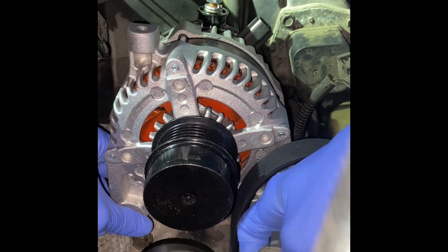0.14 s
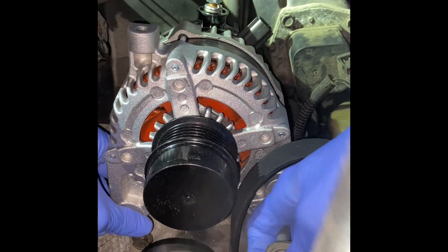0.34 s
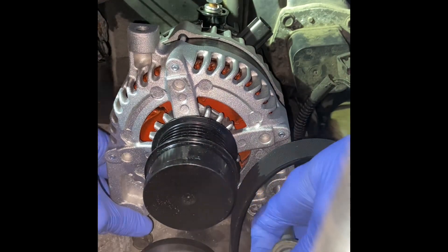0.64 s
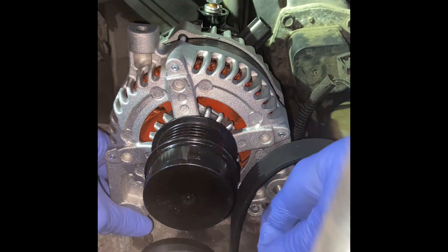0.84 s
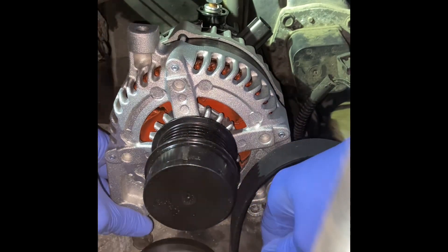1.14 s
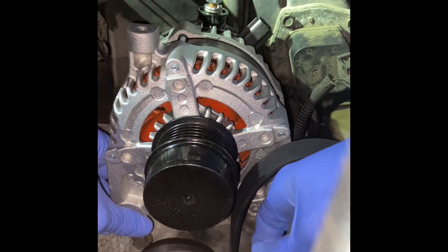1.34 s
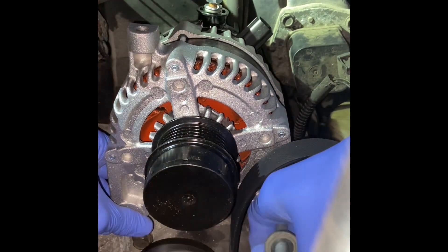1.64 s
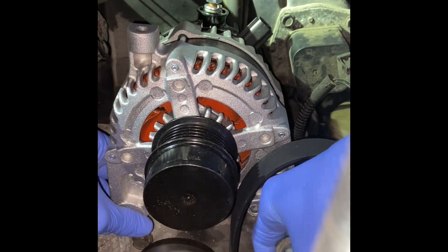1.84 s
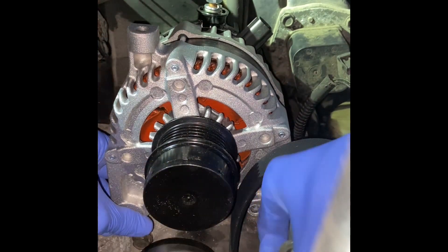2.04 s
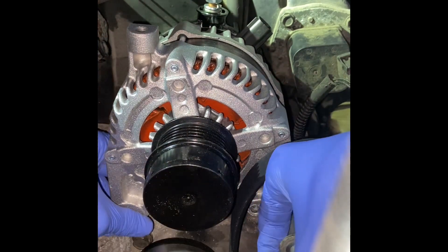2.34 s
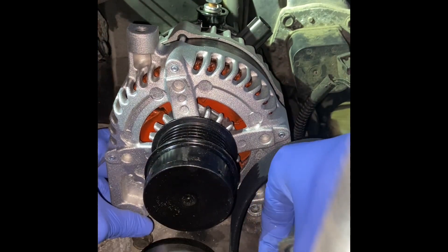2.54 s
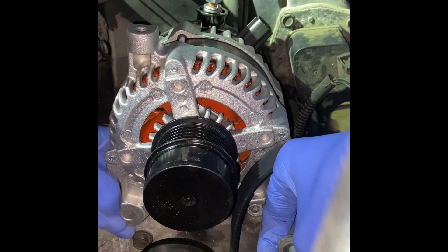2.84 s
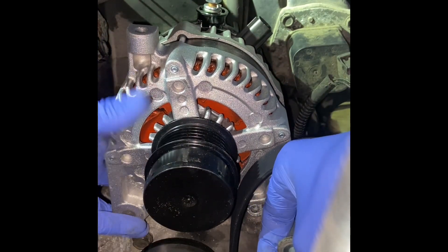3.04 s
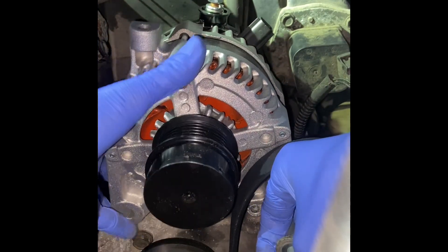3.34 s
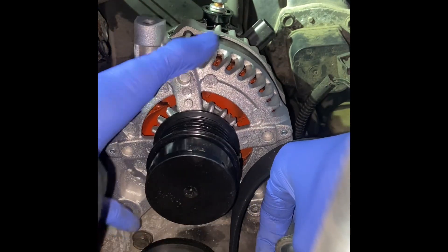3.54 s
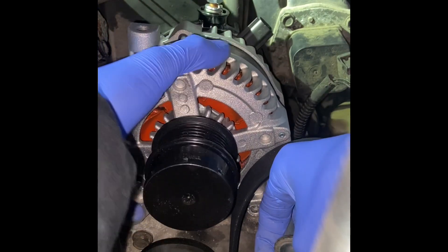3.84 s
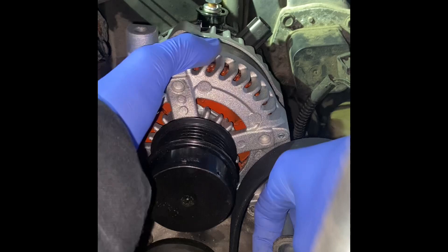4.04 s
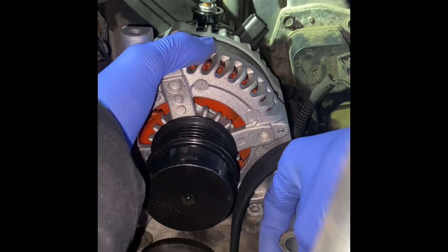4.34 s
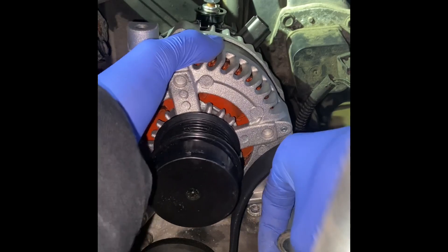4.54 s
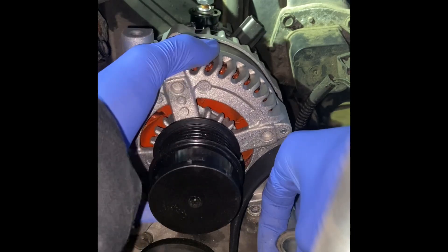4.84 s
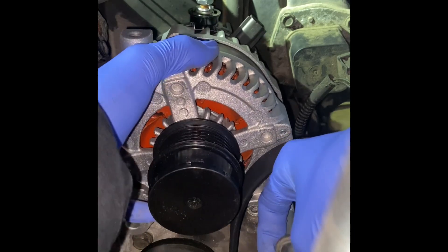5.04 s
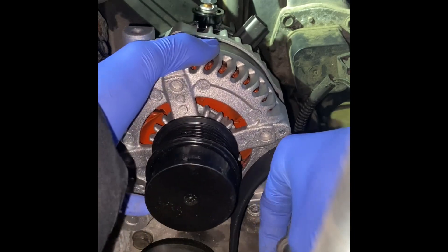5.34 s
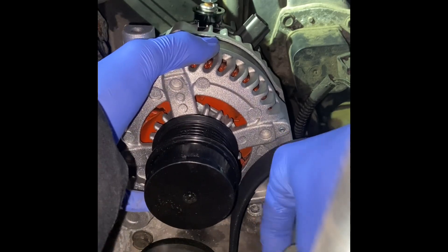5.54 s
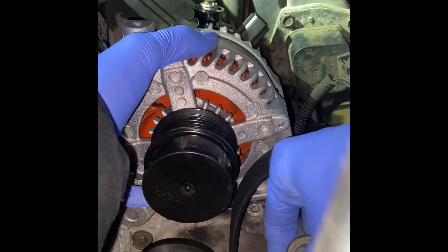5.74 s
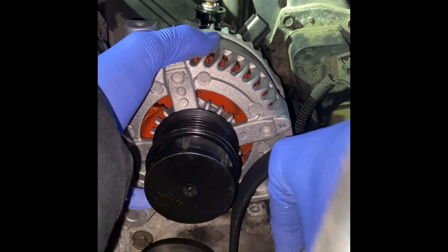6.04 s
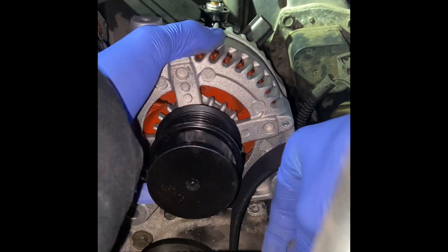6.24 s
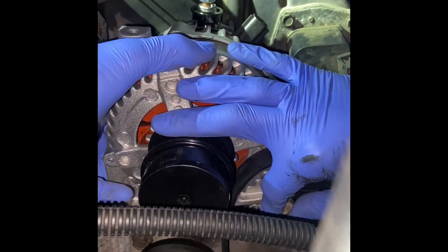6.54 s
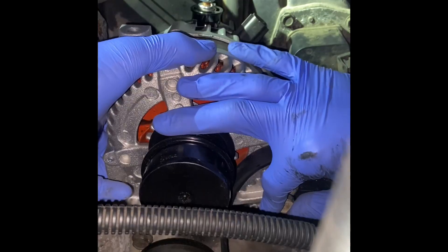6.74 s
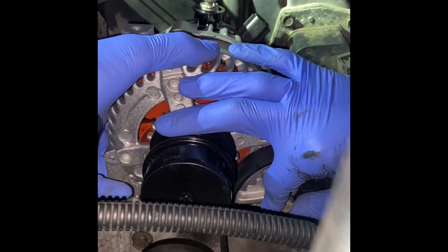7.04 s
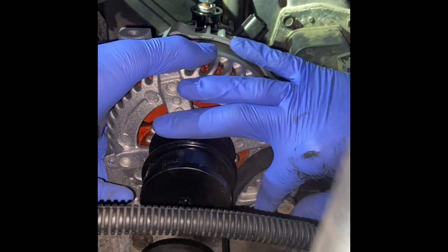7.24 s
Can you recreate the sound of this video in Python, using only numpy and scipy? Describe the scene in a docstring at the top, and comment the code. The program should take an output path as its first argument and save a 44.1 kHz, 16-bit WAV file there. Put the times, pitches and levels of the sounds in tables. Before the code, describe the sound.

In an engine bay, heard very close, gloved hands wiggle a metal casting into its bracket. A sharp clack comes early, then a tight flurry of hard knocks around one second, followed by sparser taps, scrapes and glove rubs. One strong knock with a low judder lands past four seconds. A quiet rumble and wavering hum continue beneath, and the ending is nearly still.

```python
"""An alternator is wiggled into its bracket in an engine bay by gloved hands, close to a two-port microphone.
Lugs knock on the mount: damped modes of the aluminium casting ring briefly, and the bracket adds a slow low thud.
Between knocks, friction noise rubs, squeaks and squeals as stick and slip, and small parts tick.
Filtered noise and a wavering sine make the low workshop rumble and hum underneath."""
import sys
import numpy as np
from scipy import signal
from scipy.fft import rfft, irfft, next_fast_len
from scipy.io import wavfile
from scipy.ndimage import uniform_filter1d

SR = 44100
rng = np.random.default_rng(int(sys.argv[2]) if len(sys.argv) > 2 else 0)


def store_wav(level_fs):
    """Save 16-bit WAV to argv[1]."""
    pcm = np.round(np.clip(np.atleast_2d(level_fs), -1, 1) * 32767)
    wavfile.write(sys.argv[1], SR, pcm.T.astype(np.int16))


N = 326498
T = np.arange(int(.18 * SR)) / SR  # time within one impact, s
QUIET_S = 6.335  # the rubbing drops abruptly here and the specks end


def undb(db):
    """Logarithmic level: decibels to amplitude gain."""
    return 10 ** (np.asarray(db) / 20)


def colour(x, points):
    """Minimum-phase filtering: a causal response through (f/Hz, level/dB) points, from the folded cepstrum."""
    size = 2 * next_fast_len(x.shape[-1])
    hz, db = np.transpose(points)
    f = np.maximum(np.arange(size // 2 + 1) * SR / size, 1)
    gain = undb(np.interp(np.log(f), np.log(hz), db))
    cepstrum = irfft(np.log(gain))
    cepstrum[1:size // 2] *= 2
    cepstrum[size // 2 + 1:] = 0
    response = np.exp(rfft(cepstrum))
    return irfft(rfft(x, size) * response, size)[..., :x.shape[-1]]


def band(x, lo_hz, hi_hz):
    """Band limitation: a Butterworth band-pass applied twice."""
    edges = [lo_hz, min(hi_hz, SR / 2 - 1)]
    sections = signal.butter(N=2, Wn=edges, btype="band", fs=SR, output="sos")
    return signal.sosfilt(sections.repeat(2, axis=0), x)


# side against mid at the two ports: f/Hz, level/dB
SIDE_SPECTRUM = [(30, -24.5), (150, -23), (350, -6), (700, 5), (2000, -3), (4500, 0.5), (9000, 2),
                 (12000, -7), (15000, 11.5)]


def ports(pair):
    """Coherence between two ports: a shared mid and an unrelated side that is weak in the bass."""
    side = colour(pair[1], SIDE_SPECTRUM)
    return np.array([pair[0] + side, pair[0] - side])


def level(x, db):
    """Energy normalization: set the rms of the middle."""
    return x * undb(db) / x.mean(axis=0).std()


def strength(x, db):
    """Short-time energy: set the rms of each row's strongest 5 ms."""
    power = uniform_filter1d(x ** 2, size=220)
    return x * undb(db) / np.sqrt(power.max(axis=1, keepdims=True))


def walk(rate, size=N):
    """Slow random modulation: levels held 1 / rate s and smoothed twice; spread near 1."""
    k = int(SR / rate)
    held = np.repeat(rng.standard_normal(size // k + 1), k)
    return 1.3 * uniform_filter1d(uniform_filter1d(held, k), k)[:size]


def fade(t60):
    """Exponential decay: 60 dB in t60 seconds."""
    return np.exp(-np.log(1000) * T / t60)


def modes(table, detune, damping=1):
    """Modal superposition: decaying mid and side partials, detuned by the grip, weighted by the contact point."""
    hz, db, t60 = np.transpose(table)[:, :, None]
    hz = hz * (1 + detune * rng.standard_normal(hz.shape))
    weight = undb(db + 2 * rng.standard_normal(hz.shape))
    ring = weight * np.exp((2j * np.pi * hz - damping * np.log(1000) / t60) * T)
    start_phase = np.exp(2j * np.pi * rng.random((2, len(hz))))
    pair = (start_phase @ ring).imag
    return pair / np.sqrt(np.sum(undb(db) ** 2) / 2)


def resound(x, table, damping):
    """Forced resonance: a steady excitation convolved with a body's modes, damped by the hands that hold it."""
    response = modes(table, detune=0.0024, damping=damping)[:1]
    return signal.fftconvolve(x, response, axes=1)[:, :N]


def add(out, s, sound):
    """Linear superposition: mix a sound in at s seconds."""
    i = max(int(s * SR), 0)
    out[:, i:i + sound.shape[1]] += sound[:, :out.shape[1] - i]


# noise colour of the background as the microphone delivers it: f/Hz, level/dB
BACKGROUND_COLOUR = [(15, -30.5), (30, -8), (48, 2.5), (75, 1.5), (100, -1), (150, -9), (230, -10.5),
                     (350, -18), (600, -28), (1300, -38), (3000, -51.5), (5500, -50.5), (7300, -72),
                     (10000, -52), (16000, -79.5)]
# hum against the rumble, before its random wander: t/s, level/dB
HUM_SWELL = [(0, -5.5), (2.4, -10), (2.75, 1), (3.1, -14), (6.4, -7.5), (7.1, -1), (7.4, 4.5)]
VENT_DB = -43.5  # rms of the rumble


def workshop(hum_hz=73.2):
    """Broadband and tonal noise: low ventilation rumble with a frequency-modulated hum in it."""
    rumble = level(colour(ports(rng.standard_normal((2, N))), BACKGROUND_COLOUR), 0)
    phase = 2 * np.pi * np.cumsum(hum_hz * (1 + 0.03023 * walk(13))) / SR
    swell_db = np.interp(np.arange(N) / SR, *np.transpose(HUM_SWELL)) + 1.5 * walk(0.9)
    hum = undb(swell_db) * np.sqrt(2) * np.sin(phase)  # sqrt(2): unit rms
    return (rumble + hum) * undb(VENT_DB)


STROKE_PEAK, STROKE_SHAPE = 0.36, 0.74  # share of a stroke before its fastest moment; power of its arch


def strokes(table):
    """Velocity-dependent friction: the gain of each hand stroke rises, then falls to a stop."""
    t = np.arange(N) / SR
    gain = np.zeros(N)
    for s, length, db in table:
        progress = np.interp(t, [s, s + STROKE_PEAK * length, s + length], [0, 1, 0])
        gain += undb(db) * np.sin(np.pi / 2 * progress) ** STROKE_SHAPE
    return gain


def friction(colour_points, grain_db, flutter_db):
    """Dry friction: dense little slips of uneven size, coming in fits and starts."""
    slips = rng.standard_normal((2, N)) * undb(grain_db * walk(900) + flutter_db * walk(45))
    return colour(ports(slips), colour_points)


# noise colour of the casting's scrape on its seat: f/Hz, level/dB
SCRAPE_COLOUR = [(150, -21.5), (350, 3), (700, 5), (1100, 2), (1700, 4), (2200, 1), (3000, 1.5), (3800, -7),
                 (6000, -22), (9000, -44.5)]
# noise colour of the glove rubbing as the microphone delivers it: f/Hz, level/dB
GLOVE_COLOUR = [(600, -15.5), (2000, -6), (3300, 2), (5400, 5.5), (6300, 1.5), (7400, -31.5), (8800, 0),
                (10500, -1), (12000, -2), (13600, -16), (15500, -9), (17000, -9.5)]
# the casting is shoved along its seat: start t/s, length t/s, level/dB
SHOVES = [(.305, 0.13, -48), (1.13, 0.28, -55), (1.43, 0.1, -56), (1.65, 0.13, -49), (4.47, 0.15, -53.5),
          (4.72, 0.07, -57.5), (5.125, 0.093, -49.5), (5.41, 0.11, -47.5), (5.56, 0.07, -44.5),
          (6.04, 0.16, -55), (6.14, 0.091, -56.5), (6.26, 0.05, -64), (6.83, 0.046, -59.5),
          (7.16, 0.062, -60)]
# a glove slides over the casting: start t/s, length t/s, level/dB
SLIDES = [(2.0, 0.11, -58), (2.76, 0.27, -59.5), (3.03, 0.33, -57), (3.49, 0.11, -53.5), (3.64, 0.13, -53),
          (6.04, 0.12, -58), (6.23, 0.12, -59), (7.25, 0.044, -58.5)]
# continuous light rubbing of changing level, before the random wander: t/s, level/dB
EFFORT = [(0, -60), (1.1, -63.5), (1.8, -63), (2.25, -67.5), (2.9, -61), (4.0, -61), (4.3, -64.5),
          (4.65, -62.5), (5.3, -66), (5.65, -61), (6.0, -63.5), (6.3, -53)]
QUIET_DB = -73  # rubbing level after the drop, before the random wander
FIDGET_DB, FIDGET_HZ = 2.3, 9.7  # the continuous rubbing wanders with the grip
GLOVE_IN_SHOVE_DB, SCRAPE_IN_SLIDE_DB = -8.5, -3.5  # each kind of stroke stirs the other surface too
GLOVE_IN_RUB_DB = -3.5
RING_IN_SCRAPE_DB, SHAKE_DB = -4.5, 3.5  # the casting sings against the scrape; the bracket shakes against the rub


def hands():
    """Friction-driven resonance: casting on seat and glove on casting, single strokes over continuous rubbing."""
    t = np.arange(N) / SR
    rub_db = np.where(t < QUIET_S, np.interp(t, *np.transpose(EFFORT)), QUIET_DB)
    rub = undb(rub_db + FIDGET_DB * walk(FIDGET_HZ))
    shove, slide = strokes(SHOVES), strokes(SLIDES)
    # unrelated strokes and rubbing add in power
    scrape = np.hypot(shove + undb(SCRAPE_IN_SLIDE_DB) * slide, rub)
    glove = np.hypot(slide + undb(GLOVE_IN_SHOVE_DB) * shove, undb(GLOVE_IN_RUB_DB) * rub)
    seat = friction(SCRAPE_COLOUR, grain_db=3, flutter_db=2.4)
    rubber = friction(GLOVE_COLOUR, grain_db=2.5, flutter_db=1.3)
    singing = level(seat, 0) + level(resound(seat, CASTING, damping=5.8), RING_IN_SCRAPE_DB)
    push = ports(rng.standard_normal((2, N)) * undb(4.4 * walk(12)))
    shake = band(resound(push, BRACKET, damping=3), 130, 520)
    return scrape * level(singing, 0) + glove * level(rubber, 0) + rub * level(shake, SHAKE_DB)


SPECKS_PER_S, SPECK_DB, SPECK_SPREAD_DB = 3.1, -57.5, 1.5  # rate; typical onset level; spread either way


def specks(t60=0.024):
    """Random point process: faint dry ticks from the fingers and loose parts, beginning before QUIET_S."""
    out = np.zeros((2, N))
    for when, size in rng.random((int(SPECKS_PER_S * QUIET_S), 2)):
        add(out, when * QUIET_S, undb(SPECK_SPREAD_DB * (2 * size - 1.0)) * fade(t60)[None])
    crack = ports(band(rng.standard_normal((2, N)), 2000, 5400))
    return out * level(crack, SPECK_DB)


# a lug slips regularly, squealing or juddering: start t/s, length t/s, start f/Hz, end f/Hz, level/dB
SQUEALS = [(1.654, 0.031, 225, 215, -41.5), (4.362, 0.046, 212.6, 220, -29), (5.43, 0.062, 2364, 2370, -45),
           (5.443, .036, 2050, 2060, -49.5)]
SQUEAL_JITTER, SQUEAL_FLUTTER_DB = .018, 2.5  # relative wander of the pitch; wander of the level


def squeals():
    """Self-excited oscillation: regular stick and slip makes a wavering tone that stops when the lug stops."""
    out = np.zeros((2, N))
    for s, length, start_hz, end_hz, db in SQUEALS:
        n = int(length * SR)
        hz = np.linspace(start_hz, end_hz, n) * (1 + SQUEAL_JITTER * walk(220, size=n))
        phase = 2 * np.pi * (np.cumsum(hz) / SR + rng.random((2, 1)))
        envelope = undb(SQUEAL_FLUTTER_DB * walk(160, size=n)) * signal.windows.tukey(n, .4)
        add(out, s, level(ports(np.sin(phase) * envelope), db))
    return out


# a lug catches and squeaks across its seat:
# start t/s, length t/s, resonance f/Hz at start, at end, width f/Hz, level/dB
DRAGS = [(0.248, 0.046, 1150, 1000, 503, -55.5), (0.415, 0.049, 760, 440, 520, -46.5),
         (0.608, 0.035, 3900, 3700, 1800, -57.5), (0.633, 0.024, 2800, 2700, 900, -54.5),
         (0.713, 0.044, 3640, 3800, 1640, -35.5), (0.821, 0.027, 2650, 2380, 700, -53.5),
         (0.882, 0.043, 2860, 2750, 400, -54.5), (0.992, 0.02, 2350, 2300, 900, -34),
         (1.239, 0.023, 3750, 3750, 2500, -49), (1.621, 0.011, 2400, 2200, 1200, -39),
         (1.631, 0.036, 1640, 1670, 300, -45), (1.891, 0.021, 1670, 1700, 500, -45),
         (2.354, 0.043, 630, 480, 256, -46.5), (2.586, 0.014, 3010, 3000, 300, -49.5),
         (3.484, .02, 2490, 1990, 400, -50), (4.337, 0.01, 2300, 2200, 1800, -41),
         (4.916, 0.0089, 2350, 2300, 302, -52.5), (5.437, 0.022, 1340, 1050, 500, -54),
         (5.43, 0.074, 3000, 2980, 260, -52), (5.587, 0.034, 815, 820, 494, -45),
         (5.787, 0.016, 690, 650, 400, -53.5), (6.057, 0.083, 2700, 2940, 500, -63),
         (6.105, 0.018, 2350, 2420, 600, -45), (6.155, 0.017, 1480, 1400, 1300, -49.5),
         (6.244, 0.0094, 3440, 3440, 3000, -47), (6.307, 0.021, 2300, 2200, 2200, -53.5)]
# the skid after each knock; its level is against the knock's body register
SKID_DELAY_S, SKID_S, SKID_HZ, SKID_WIDTH_HZ, SKID_DB = 0.0019, 0.024, 1590, 1500, -23.5


def drags():
    """Stick and slip into one gliding resonance: lone squeaks, and the skid after each knock."""
    out = np.zeros((2, N))
    slips = ports(rng.standard_normal((2, N)) * undb(3.5 * walk(450)))
    skids = [(s + SKID_DELAY_S, SKID_S, SKID_HZ, SKID_HZ, SKID_WIDTH_HZ, db + body + SKID_DB)
             for s, db, _, _, _, _, body, *_ in KNOCKS]
    for s, length, start_hz, end_hz, width_hz, db in DRAGS + skids:
        stroke = slips[:, int(s * SR):int((s + length) * SR)]
        # shift the resonance to 0 Hz, low-pass there, and shift back
        turn = np.exp(2j * np.pi * np.cumsum(np.linspace(start_hz, end_hz, stroke.shape[1])) / SR)
        low_pass = signal.butter(N=2, Wn=width_hz / 2, fs=SR)
        ring = (signal.lfilter(*low_pass, stroke / turn) * turn).real
        add(out, s, level(ring * signal.windows.tukey(ring.shape[1], .5), db))
    return out


# modes of the bracket and the engine behind it: f/Hz, level/dB, undamped t60 t/s
BRACKET = [(134.3, -3, 0.095), (173.4, -7.5, 0.15), (209.2, -4, 0.24), (243.7, -7, 0.26),
           (314.6, -10, 0.13), (350.2, -17, 0.14)]


def thud(db, hz, swell_s=0.0048, boom_db=-3, boom_t60=0.2, skirt_db=-9):
    """Inertia and cavity resonance: the heavy bracket swings up slowly and booms in the hollow of the bay."""
    boom = band(rng.standard_normal((2, len(T))), 95, 423)
    body = modes(BRACKET, detune=.03) + undb(boom_db) * boom / boom.std() * fade(boom_t60)
    swell = 1 - np.exp(-(T / swell_s) ** 2)
    # the response is centred on hz and falls an octave to each side
    body = colour(body * swell, [(hz / 2, skirt_db), (hz, 0), (2 * hz, skirt_db)])
    return ports(strength(body, db))


# soft pushes that only shake the bracket: t/s, level/dB before offset_db, centre f/Hz
BUMPS = [(0.518, -25, 165), (0.944, -32, 170), (1.004, -17, 162), (1.085, -28, 165), (1.222, -33.5, 284),
         (1.384, -35, 215), (1.851, -30, 224), (1.905, -23, 139), (2.491, -34.5, 263), (3.783, -32.5, 148),
         (4.759, -35.5, 217), (5.403, -32.5, 217), (5.58, -25, 135), (5.729, -32, 135), (5.876, -33, 302),
         (6.161, -28, 190), (6.187, -32, 364), (6.849, -33.5, 121)]


def bumps(offset_db=-5):
    """Low-frequency excitation: soft pushes sound the bracket without any metal ring."""
    out = np.zeros((2, N))
    for s, db, hz in BUMPS:
        add(out, s, thud(db + offset_db, hz, swell_s=0.0029))
    return out


def chatter(ring, gap_s, loss_db, count=5):
    """Inelastic rebound: the lug returns a few times at uneven gaps, weaker each time."""
    out = ring.copy()
    gaps = gap_s * rng.uniform(.3, 1.7, count)
    for k, s in enumerate(np.cumsum(gaps), 1):
        add(out, s, undb(k * loss_db) * ring)
    return out


RATTLE_PER_S, RATTLE_T60_S = 450, .085  # mean rate of touches; decay of their strength


def rattle(contact):
    """Random repeated impact: the settling lug touches again and again, more and more lightly."""
    touched = rng.random(len(T)) < RATTLE_PER_S / SR
    touches = touched * rng.uniform(.4, 1, len(T)) * fade(RATTLE_T60_S)
    return signal.fftconvolve(contact, touches[None], axes=1)[:, :len(T)]


# modes of the casting: f/Hz, level/dB, undamped t60 t/s
CASTING = [(830, -12, .1), (955, -6, .14), (1130, -9, .1), (1250, -6, .12), (1365, 0, .11), (1490, -3, .13),
           (1710, -1, .14), (1895, -5, .11), (2030, 2, .11), (2120, 0, .09), (2293, -1, .1), (2410, -4, .1),
           (2570, -6, .09), (2880, -7, .09), (3150, -6, .07), (3420, -9, .06), (3655, -2, .06),
           (4155, -5, .07), (4020, -5, .05), (4380, 0, .05), (4630, -2, .05), (4960, 0, .05),
           (5570, -5, .06), (5790, -3, .05), (6170, -3, .05), (6420, -7, .05), (8160, -3, .04),
           (9300, -5, .04), (10700, -2, .04), (11200, -1, .04)]
# relative gain of the treble register: f/Hz, level/dB
TREBLE_SPECTRUM = [(8000, 0.5), (11000, 0), (12300, -2.5), (13600, -11.5), (15300, -4)]
RING_WIDTH_OCT, RING_SKIRT_DB = .8, -10.5  # the ring falls by this much so far from its centre
LOOSE_GAP_S, RATTLE_DB = 0.0017, -15.5  # a loose blow: its rebound gap and the gain of its rattle


def metal(db, ring_hz, gap_s, body, clack, edge, top, rise_s=0.00073, crack_t60=0.022, crack_db=-3,
          clamped=4.2, free_db=-13.5, bay_db=-21.0, bay_t60=0.12, top_t60=0.15):
    """Impact and modal decay: a crack at every rebound, casting modes, and scattered reflections in the bay."""
    # chatter acts on power, so the cracks add as unrelated noise
    crack_power = chatter(fade(crack_t60)[None] ** 2, gap_s, loss_db=-4.0)
    crack = undb(crack_db) * rng.standard_normal((2, len(T))) * np.sqrt(crack_power)
    bay = rng.standard_normal((2, len(T))) * fade(bay_t60) * undb(2.9 * walk(390, size=len(T)))
    # the modes die fast while the lug is pressed on the bracket; a little rings on freely
    pressed = chatter(modes(CASTING, detune=0.0094, damping=clamped), gap_s, loss_db=-6.0, count=3)
    casting = pressed + undb(free_db) * modes(CASTING, detune=0.0029)
    # a looser blow builds up more slowly and rattles more
    loose = gap_s / LOOSE_GAP_S
    settling = loose * undb(RATTLE_DB) * rattle(pressed + crack)
    onset = 1 - np.exp(-T / (rise_s * loose ** 2))
    hit = (casting + crack + settling + undb(bay_db) * bay) * onset
    # the place of contact decides which registers sound and where the ring is centred
    spread = 2 ** RING_WIDTH_OCT
    ring_shape = [(ring_hz / spread, RING_SKIRT_DB), (ring_hz, 0), (ring_hz * spread, RING_SKIRT_DB)]
    ring = colour(band(hit, 3000, 5600), ring_shape)
    # a harder contact reaches higher, and the top dies first
    reach_hz = np.interp(top - clack, [-20, -5], [11500, 16500])
    treble = colour(band(hit, 7900, reach_hz), TREBLE_SPECTRUM) * fade(top_t60)
    registers = [(band(hit, 690, 2200), body), (band(hit, 1857, 3300), clack), (ring, 0),
                 (band(hit, 5315, 6480), edge), (treble, top)]
    return ports(sum(strength(part, db + part_db) for part, part_db in registers))


# light touches of metal: t/s, ring level/dB (strongest 5 ms), then level/dB against the ring: clack, top
TICKS = [(0.0906, -48.5, -3, -1), (0.125, -53.5, 5.5, -6), (0.842, -50.5, -3, -7), (0.866, -49, -7, -8),
         (0.89, -50, -5, 0.5), (0.9757, -42, -0.5, -22), (1.0145, -45, -2, -22), (1.0431, -44, 1, -12),
         (1.056, -44, 2, -15), (1.0805, -45, 6, -11), (1.0926, -52, 3, -4), (1.103, -55, 2, -14),
         (1.228, -51, -9, -10), (1.287, -45, -8, -11), (1.946, -66, 6, -11), (2.376, -42, -6, -12),
         (2.59, -52, -2, -9), (2.866, -49.5, -4, -5), (3.062, -61, 4, 9), (3.274, -49.5, -7.5, -1),
         (3.49, -41.5, -7, -6.5), (3.511, -59.5, -8, 12), (3.6356, -48, -14, 1.5), (3.929, -68, 14, -14),
         (4.331, -51, -9, -25), (4.728, -54, 1, -22), (4.7394, -48, -18, -18), (4.7655, -57, -11, 2),
         (4.9147, -51, -9, 0.5), (4.954, -58, -2, -12), (5.119, -54.5, 2, 1), (5.2942, -51, -6, -30),
         (5.4086, -49.5, -1, -12.5), (5.4818, -43.5, -18, 0.5), (5.56, -47.5, -5, -10.5),
         (5.575, -49, -6, -13), (5.788, -56.5, -2, -12), (5.8247, -52.5, -16, 0), (6.456, -62, -6.5, -8),
         (6.5686, -48.5, 6.5, -23.5)]


def ticks(body_db=-4, edge_db=-7):
    """Light impact: brief metal touches; the body level follows the clack by body_db."""
    out = np.zeros((2, N))
    for s, db, clack, top in TICKS:
        touch = metal(db, 4200, 0.00079, clack + body_db, clack, edge_db, top, crack_t60=0.032, crack_db=-1.0)
        add(out, s, touch)
    return out


# lug on bracket: t/s, ring level/dB (strongest 5 ms), ring centre f/Hz, rebound gap t/s, thud centre f/Hz,
# then level/dB against the ring: thud (before thud_db), body, clack, edge near 6000 Hz, top
KNOCKS = [(0.5029, -44.0, 4620, 0.0015, 178, 10.5, -10.5, -5.5, -1, -2.5),
          (0.7355, -13.5, 3800, 0.00087, 177, -16.5, -26, -16.5, -20, -18.5),
          (0.9905, -22.5, 4130, 0.00078, 174, -2, -0.5, 2.5, -3.5, -5),
          (1.0234, -16.5, 4550, 0.001, 231, -18.0, -18, -19, -15, -19),
          (1.0282, -19.5, 4680, 0.0016, 151, -5.5, -9, -2.5, -3.5, -7),
          (1.0642, -23.5, 4750, 0.0014, 132, -6, -0.5, 1, -9, -18.5),
          (1.2618, -26.5, 3850, 0.001, 121, -8.5, -17, -6.5, -10, -16),
          (1.2687, -26.5, 4050, 0.0012, 236, -16, -11.5, -7, -15, -11.5),
          (1.6266, -32, 4440, 0.0019, 220, -0.5, 9.5, 8, -7.5, -15.5),
          (1.8837, -33, 3870, 0.0027, 138, 8, 0.5, 0, -3.5, -3.0),
          (2.3648, -49, 4200, 0.0015, 238, 11.5, -5, 3, -10, 3),
          (2.5484, -40.5, 4680, 0.00096, 165, 8, -9.5, -5, 0, -3),
          (3.623, -39.5, 4540, 0.00073, 212, 4.5, -6.5, -9, -5.5, -9),
          (3.9894, -37, 4700, 0.00082, 204, 2, -10, -13, -5, -8),
          (4.1874, -46.5, 3900, 0.0014, 151, 10.5, -2, -3.5, -7, -15),
          (4.344, -21.5, 4450, 0.00097, 200, -3, 3.5, 4.5, -6, -14),
          (5.04, -37.5, 3920, 0.001, 124, 2, -15, -12, -14, -19),
          (5.5944, -35, 3900, 0.0015, 136, 6, -2, 3.5, -3, -1.5),
          (6.254, -41.5, 4040, 0.0021, 162, -1.5, -8, -13, -18, -12)]


def knocks(thud_db=1):
    """Coupled impact: each lug blow rings the casting and swings the bracket into a thud."""
    out = np.zeros((2, N))
    for s, db, ring_hz, gap_s, thud_hz, low, body, clack, edge, top in KNOCKS:
        add(out, s, metal(db, ring_hz, gap_s, body, clack, edge, top))
        add(out, s, thud(db + low + thud_db, thud_hz))
    return out


def scene():
    """Superposition: the workshop, rubbing and small sounds under the knocks."""
    return workshop() + hands() + specks() + squeals() + drags() + bumps() + ticks() + knocks()


TOP_HZ = 16300


def record(dry):
    """Saturation and band limitation: clip the peaks, then cut above TOP_HZ with an elliptic low-pass."""
    low_pass = signal.ellip(8, .2, 70, TOP_HZ, fs=SR, output="sos")
    return signal.sosfilt(low_pass, np.clip(dry, -.95, .95))


dry = scene()
out = record(dry)
store_wav(out)
```